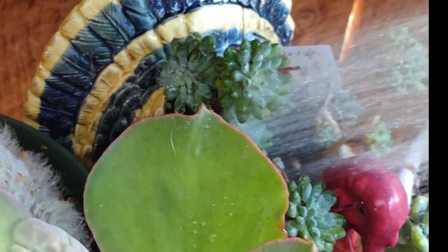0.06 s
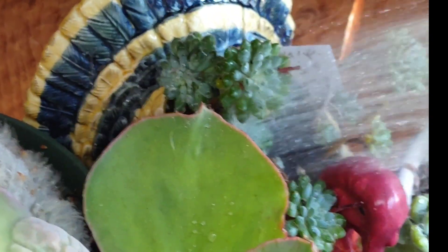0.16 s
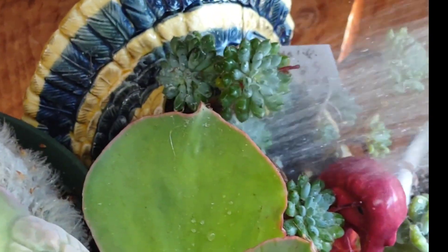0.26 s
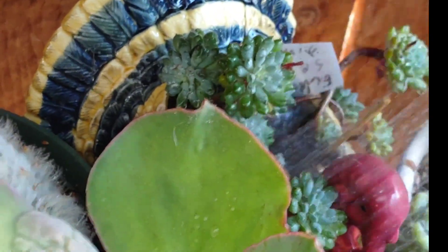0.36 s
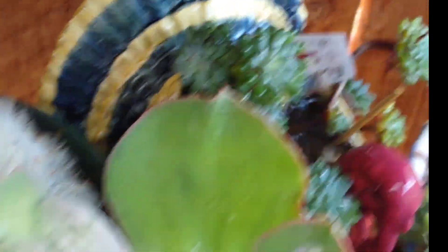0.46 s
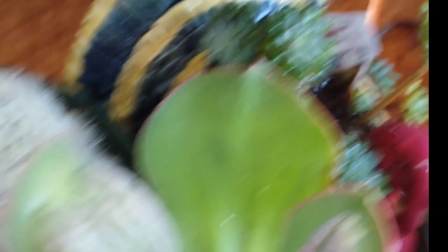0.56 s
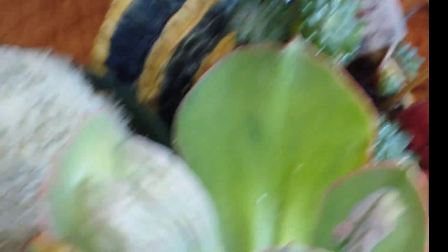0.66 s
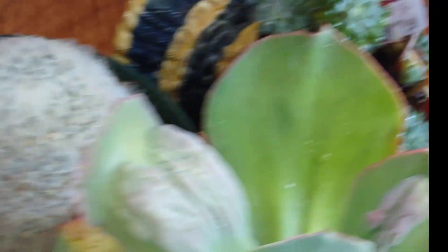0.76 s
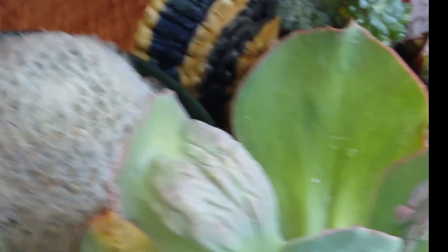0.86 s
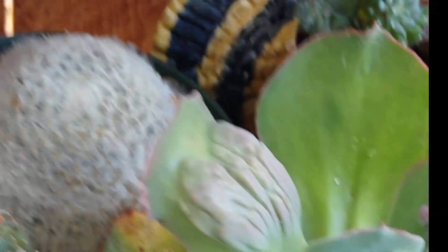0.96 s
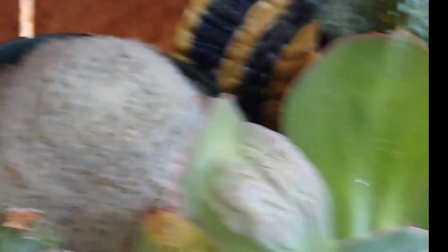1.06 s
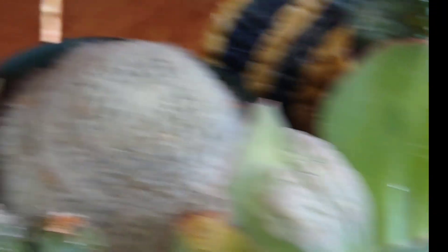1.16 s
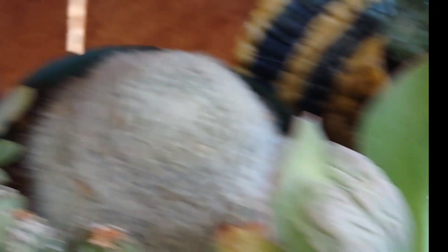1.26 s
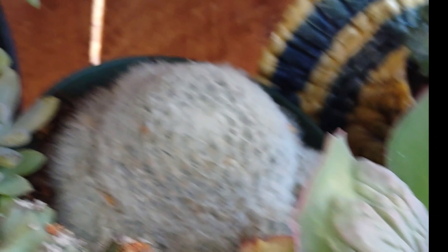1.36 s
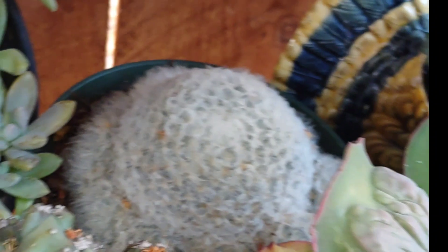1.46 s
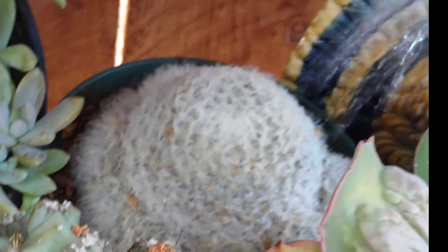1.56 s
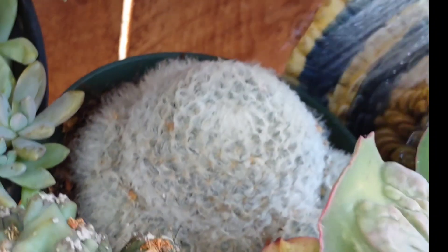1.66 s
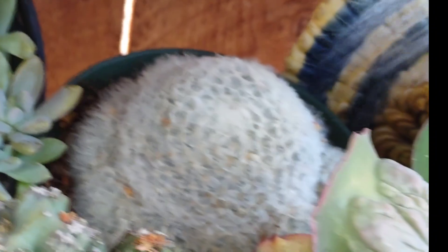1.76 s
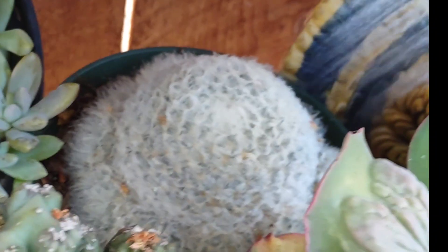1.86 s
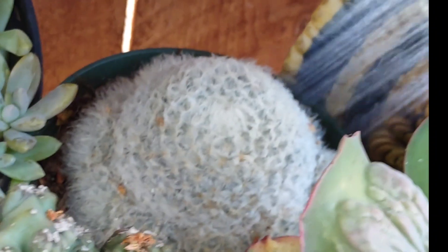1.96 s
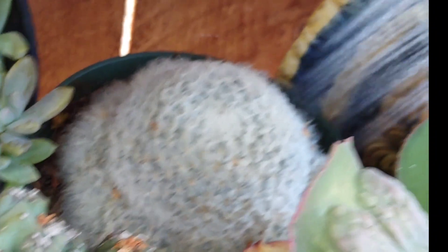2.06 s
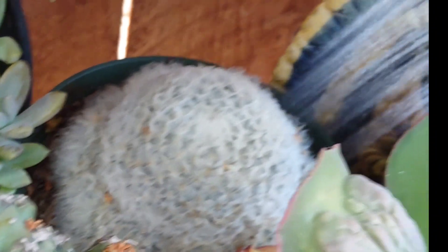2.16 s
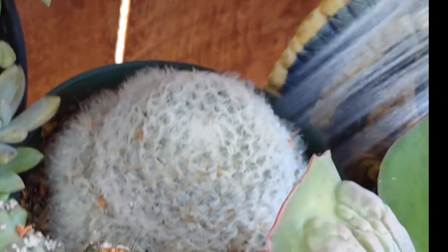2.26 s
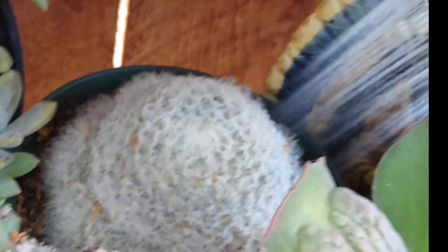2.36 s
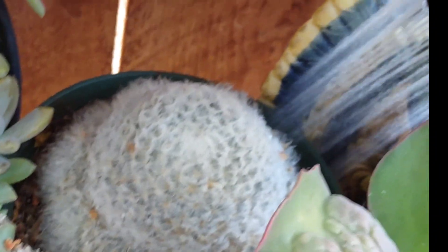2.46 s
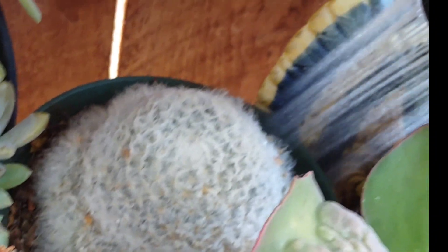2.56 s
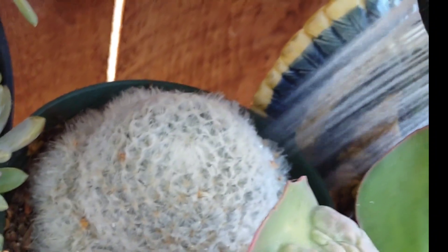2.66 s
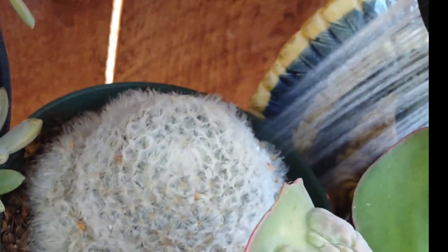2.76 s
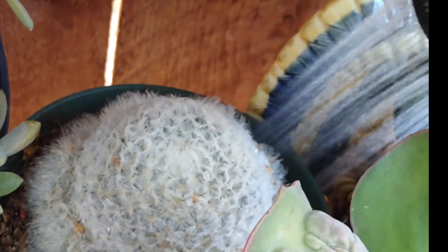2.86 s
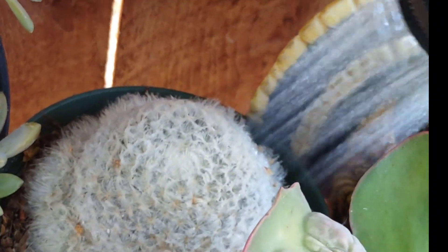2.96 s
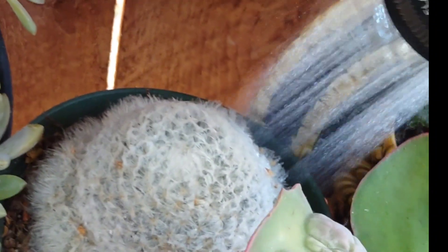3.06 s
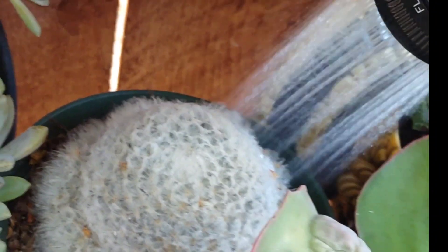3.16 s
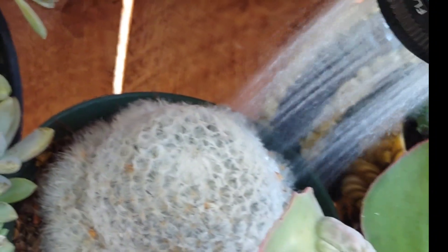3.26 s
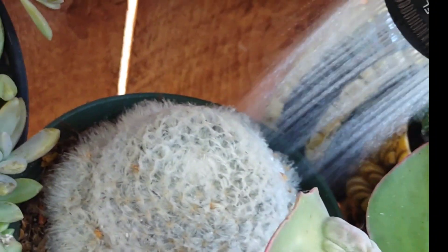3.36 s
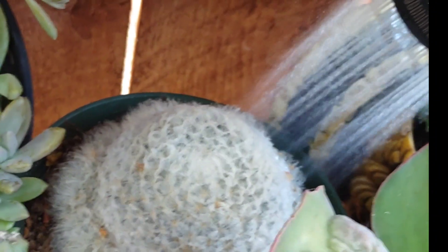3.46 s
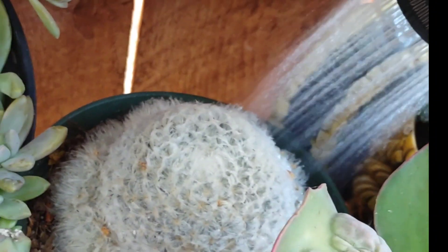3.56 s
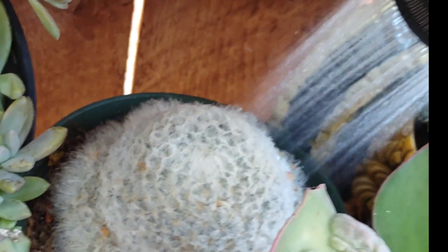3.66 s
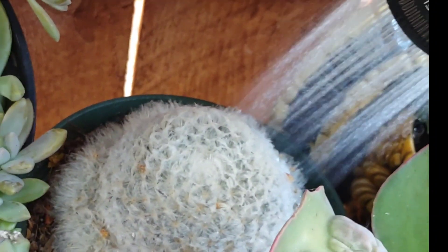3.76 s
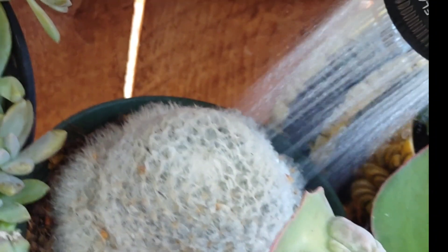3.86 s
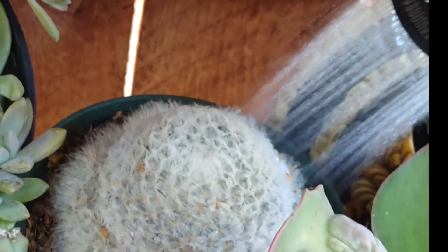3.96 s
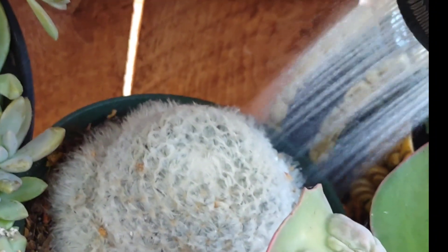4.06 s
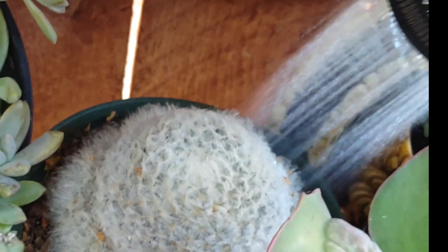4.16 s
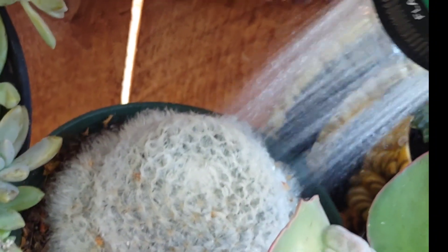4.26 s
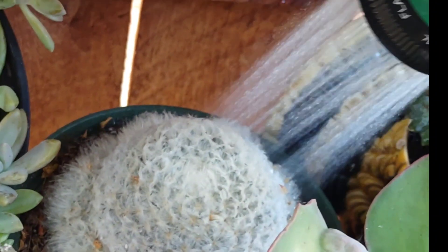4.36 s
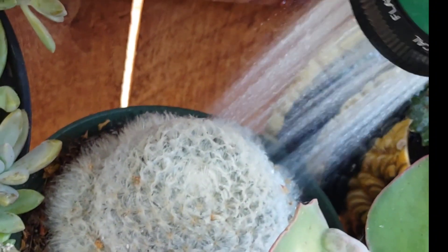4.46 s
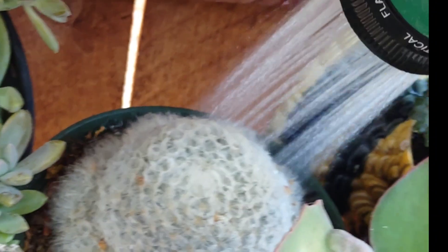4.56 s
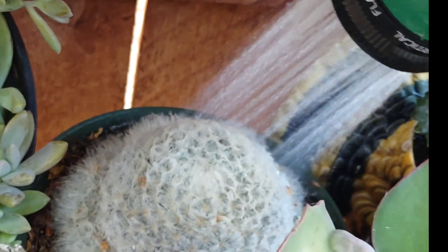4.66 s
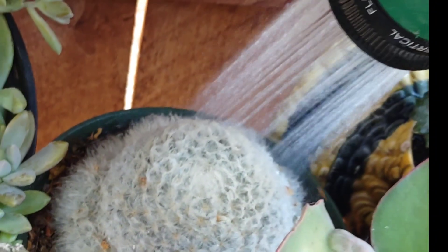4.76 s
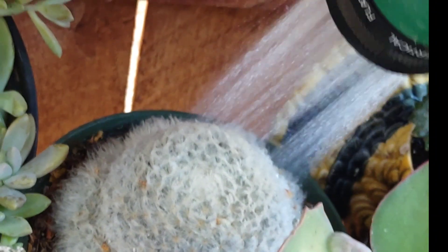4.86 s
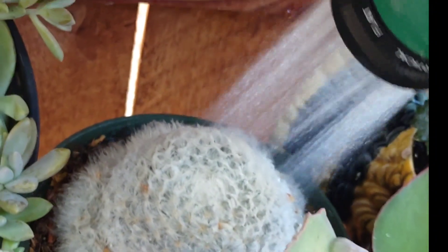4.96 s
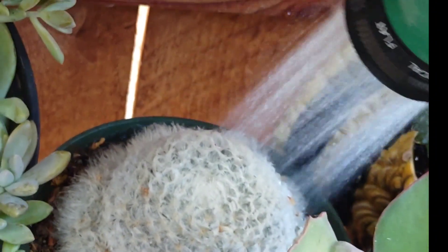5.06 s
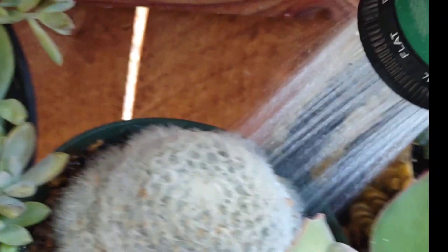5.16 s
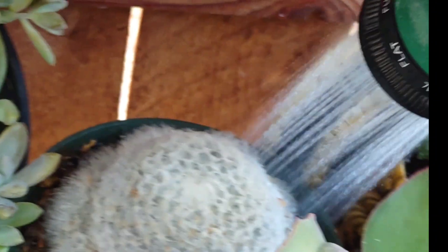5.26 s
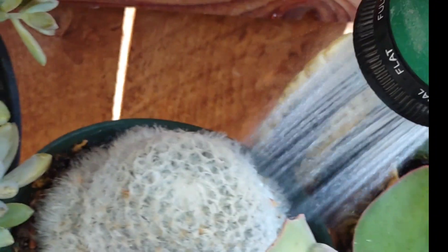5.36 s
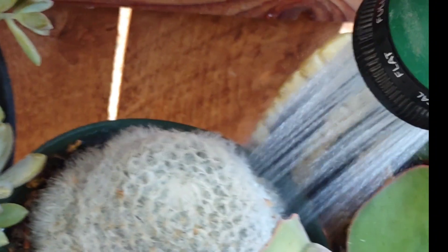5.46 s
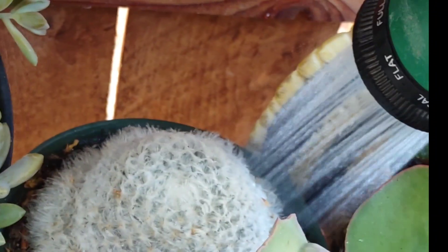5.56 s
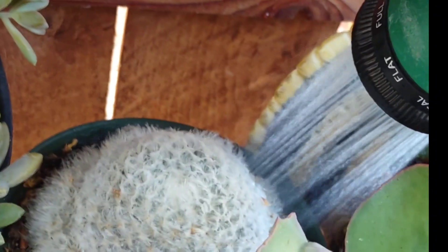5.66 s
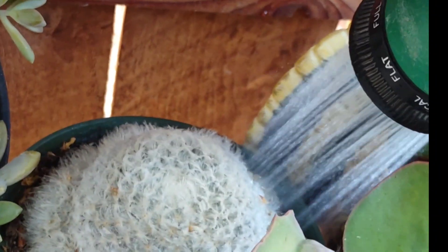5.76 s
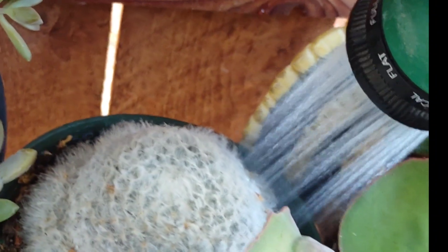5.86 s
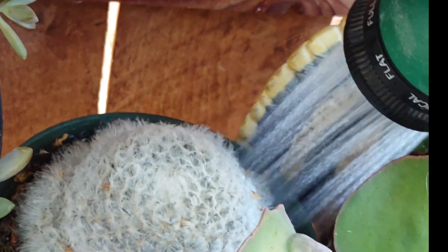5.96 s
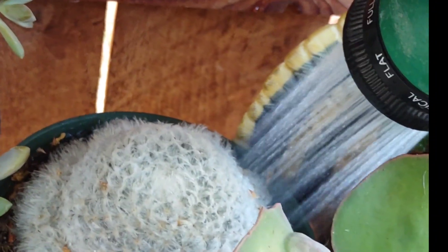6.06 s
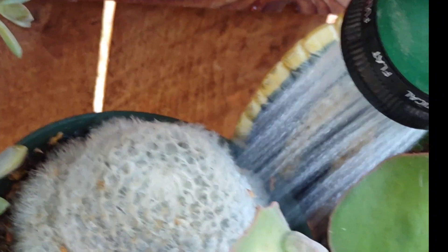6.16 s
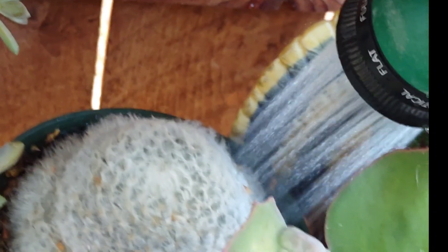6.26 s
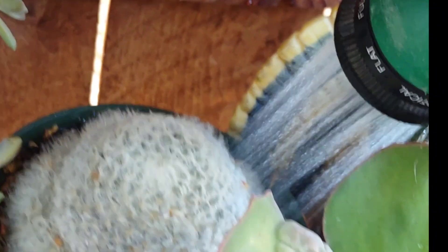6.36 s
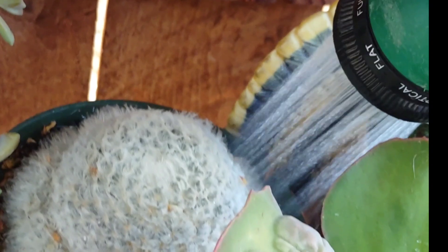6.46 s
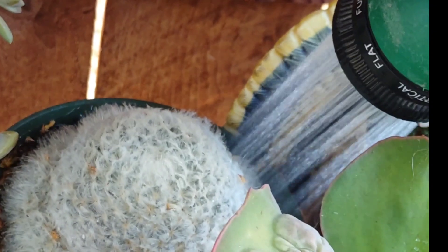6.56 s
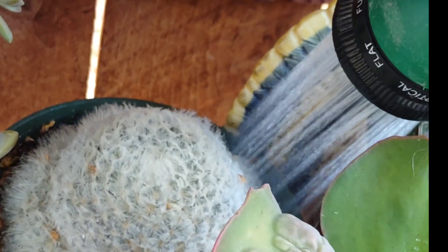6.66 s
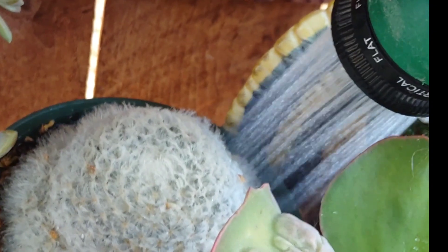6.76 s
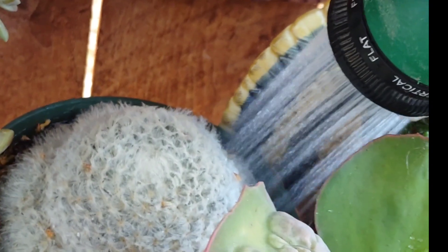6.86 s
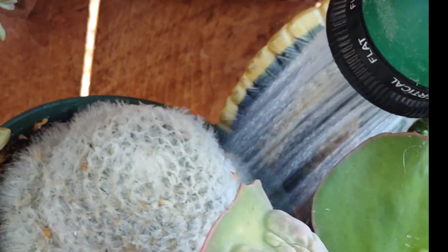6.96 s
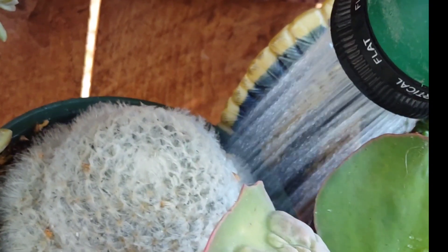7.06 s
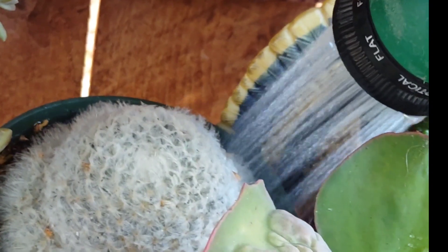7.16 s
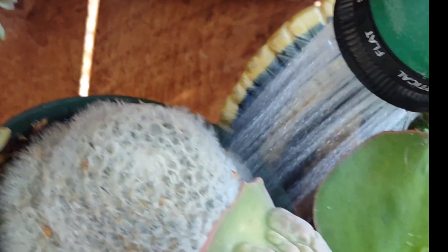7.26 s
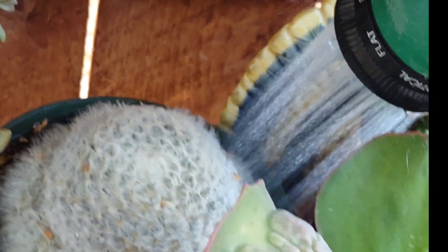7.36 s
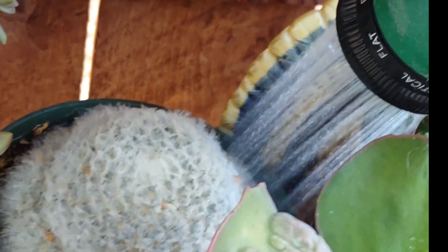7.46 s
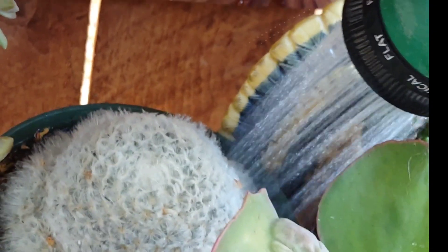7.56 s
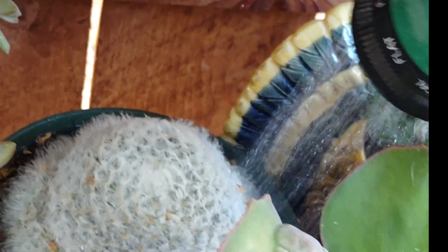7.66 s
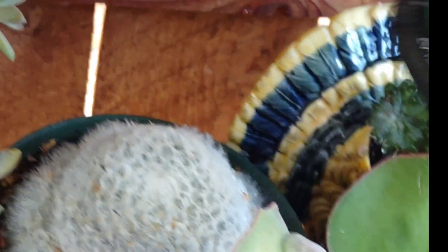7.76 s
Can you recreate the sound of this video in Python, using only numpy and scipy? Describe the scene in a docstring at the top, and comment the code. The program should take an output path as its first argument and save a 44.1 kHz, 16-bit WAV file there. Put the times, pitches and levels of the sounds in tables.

```python
"""A garden hose sprays potted succulents an arm's length away, outdoors, and is let go almost at once.
For a second the plants drip and a few bubbles plink. The trigger snaps and the spray builds again on a
glazed ceramic dish: thousands of drops a second hiss and drum on leaves and glaze, coloured by the
hollows they land in as the aim moves. Clumps of water slap the leaves and the hand bumps the nozzle.
Just before the end the jet shuts off, leaving a few last drips."""
import sys
import numpy as np
from scipy import signal
from scipy.fft import rfft, irfft
from scipy.io import wavfile
from scipy.ndimage import map_coordinates

SR = 44100
rng = np.random.default_rng(int(sys.argv[2]) if len(sys.argv) > 2 else 0)


def int16_out(signal):
    """Quantize to a 16-bit WAV file."""
    q = np.round(np.clip(np.atleast_2d(signal).T, -1, 1) * 32767)
    wavfile.write(sys.argv[1], SR, q.astype(np.int16))


N = 343980
TIME = np.arange(N) / SR
BINS = np.maximum(np.arange(2049) * SR / 4096, 1)  # frequency axis of every tone curve [Hz]
DRUM_POWER = 2.3  # drumming and slaps grow faster with the flow than the hiss does

# squeezes of the trigger: (valve opens [s], starts to close [s], closing time [s])
SQUEEZES = [(-1.6, 0.26, 0.075), (1.397, 7.648, 0.045)]
# bright tone of water trickling on the pots: (frequency [Hz], level [dB])
TRICKLE_TONE = [(400, -16.5), (1900, -15), (2400, -7.5), (2950, -0.5), (3700, 3), (4500, 3.5), (5600, 5.5),
                (6500, 4), (8600, 6), (10000, 1.5), (11500, 8.5), (15000, 0)]


def undb(db):
    """Decibels to gain."""
    return 10 ** (np.asarray(db) / 20)


def unit(x):
    """Scale to rms 1."""
    return x / np.sqrt(np.mean(x ** 2))


def shape(points):
    """A tone curve through (Hz, dB) points on a log-frequency axis."""
    hz, db = np.transpose(points)
    return np.interp(np.log(BINS), np.log(np.sort(hz)), db)


def lifts(modes):
    """A tone curve of peaks and dips, each (Hz, width in Hz, lift in dB)."""
    return sum(db / (1 + (2 * (BINS - hz) / width) ** 2) for hz, width, db in modes)


def colour(x, db):
    """Minimum-phase EQ: apply a tone curve with no ringing ahead of the attack."""
    cepstrum = irfft(np.log(undb(db)))
    half = len(cepstrum) // 2
    cepstrum[1:half] *= 2
    response = irfft(np.exp(rfft(cepstrum[:half], 2 * half)))[:half]
    return signal.oaconvolve(x, response[None], axes=-1)[:, :x.shape[-1]]


def pan(db):
    """Left and right gains for a pan given as left minus right in dB."""
    return undb(np.array([db, -db]).reshape(2, -1) / 2)


def walk(rate):
    """Random wandering with a spread near 1, heading for a new value `rate` times a second."""
    knots = rng.standard_normal(2000)
    return np.interp(TIME * rate, np.arange(len(knots)), knots)


def add(out, s, sound):
    """Mix a sound in at s seconds."""
    start = int(s * SR)
    out[:, start:start + sound.shape[1]] += sound[:, :N - start]


def spread(pair):
    """Stereo width: the right side is part the left one, shifted in phase, and part its own."""
    # how alike the two microphones hear: (frequency [Hz], coherence [0-1], right-to-left phase [rad])
    likeness = [(120, .96, 0), (350, .84, 0), (750, .55, -.1), (950, .3, -.5), (1150, .75, -.5),
                (1400, .65, -1.1), (1600, .2, -.5), (1780, .65, .4), (2000, .8, -.3), (2450, .65, -.5),
                (2800, .25, -.8), (3300, .45, -1.6), (3800, .55, -3.3), (4400, .55, -5.4),
                (5000, .45, -4.8), (6400, .55, -2.6), (7300, .45, -2.3), (9300, .2, -3.1),
                (10400, .25, -6.2), (12500, .15, -11)]
    hz, coherence, phase = np.transpose(likeness)
    bins = np.arange(N // 2 + 1) * SR / N
    alike = np.interp(bins, hz, coherence).clip(0, 1)
    left, own = rfft(pair)
    right = alike * np.exp(1j * np.interp(bins, hz, phase)) * left + np.sqrt(1 - alike ** 2) * own
    return np.array([pair[0], irfft(right, N)])


def garden(air_db=-64, hum_hz=209, hum_db=-75):
    """A bed of quiet outdoor air with a faint far-off hum."""
    # dark tone of the open air: (frequency [Hz], level [dB])
    air_tone = [(20, -13), (60, 2), (130, 5), (200, 1.5), (400, 2.5), (700, -5), (1500, -5), (4000, -30),
                (15000, -49)]
    air = unit(colour(spread(rng.standard_normal((2, N))), shape(air_tone)))
    hum = np.sin(2 * np.pi * hum_hz * TIME + walk(rate=6))
    return undb(air_db + 1.8 * walk(rate=3.82)) * air + undb(hum_db) * hum


def thud(hz, width_hz, decay_s):
    """A short push on something damped, with one broad resonance; peak 1."""
    t = TIME[:4096]
    push = np.exp(-t / decay_s) * rng.standard_normal((1, len(t)))
    detune = (BINS - hz ** 2 / BINS) / width_hz
    body = colour(push, -20 * np.log10(1 + detune ** 2).clip(0, 5))
    return body / abs(body).max()


def knocks():
    """The hand bumps and shifts on the nozzle."""
    # bumps: (time [s], peak [dB], pitch [Hz], width [Hz], decay [s], pan [dB])
    bumps = [(4.0105, -19, 3400, 5000, .0015, 14), (4.011, -38.5, 400, 1800, .0015, 6),
             (4.838, -46, 170, 700, .02, 0), (4.87, -46.5, 570, 220, .014, -1),
             (4.89, -51, 340, 340, .018, 0), (5.508, -48, 220, 420, .007, 0),
             (6.922, -50, 300, 700, .006, 0)]
    out = np.zeros((2, N))
    for s, db, hz, width_hz, decay_s, pan_db in bumps:
        add(out, s, undb(db) * pan(pan_db) * thud(hz, width_hz, decay_s))
    return out


def trigger(echo_db=-31, echo_decay_s=0.0057):
    """The nozzle's plastic trigger snaps; the pots send back a thin, bright echo."""
    # snaps: (time [s], gain [dB], pan [dB])
    snaps = [(1.295, -2.5, 16.5), (1.438, -13, 11)]
    # tone of the snapping plastic: (frequency [Hz], level [dB])
    snap_tone = [(150, -27), (500, -10), (1400, -6), (3000, -3), (6000, -23), (8500, 20.5), (10200, -6),
                 (12000, -2), (13000, -8), (15000, -14)]
    out, t = np.zeros((2, N)), TIME[:2048]
    crack = colour(signal.unit_impulse(len(t))[None], shape(snap_tone))
    for s, db, pan_db in snaps:
        echo = undb(echo_db) * np.exp(-t / echo_decay_s) * rng.standard_normal((2, len(t)))
        add(out, s, undb(db) * pan(pan_db) * (crack + colour(echo, shape(TRICKLE_TONE))))
    return out


def bubble(hz, attack_s=0.00077, decay_s=0.005):
    """A trapped bubble rings for a few milliseconds, roughened by the splash around it."""
    t = TIME[:2048]
    envelope = (1 - np.exp(-t / attack_s)) * np.exp(-t / decay_s)
    wobble = .16 * np.cumsum(rng.standard_normal((2, len(t))), axis=1)
    return envelope * np.sin(2 * np.pi * hz * t + wobble)


def bubbles(trim_db=-1, pan_db=1.5):
    """A few drips fall into standing water and plink."""
    # the clearest bubbles: (time [s], gain [dB], pitch [Hz])
    plinks = [(0.461, -34.5, 3000), (0.627, -37, 2900), (.702, -35, 2860), (0.816, -30.5, 3800),
              (.974, -29.5, 3030), (1.099, -40, 3100), (1.419, -36, 1900), (7.793, -27, 4900)]
    out = np.zeros((2, N))
    for s, db, hz in plinks:
        add(out, s, undb(db + trim_db) * pan(pan_db) * bubble(hz))
    return out


def splash(ring_hz, ring_db, softness_db, decay_s, ring_width_hz=600):
    """One drop spreads, fizzes out and rings the wet hollow that it hits."""
    # the wet pots ring under every drop: (frequency [Hz], width [Hz], lift [dB])
    wet_pots = [(2900, 180, 2.5), (3600, 430, -3), (4200, 200, 4), (4800, 300, -1), (5430, 320, 2),
                (6100, 300, -2), (8500, 310, 2)]
    t = TIME[:4096]
    attack = 1 - np.exp(-t / .00025)
    tail = undb(-16) * np.exp(-t / .018)
    envelope = attack * (np.exp(-t / decay_s) + tail)
    landing = (3600, 3000, softness_db)  # a soft landing sounds low, a hard one bright
    tone = shape(TRICKLE_TONE) + lifts([landing, (ring_hz, ring_width_hz, ring_db)] + wet_pots)
    tone -= 10 * np.log10(np.mean(undb(tone) ** 2))  # same power whatever the tone
    return colour(envelope * rng.standard_normal((2, len(t))), tone)


def drips(trim_db=-1, ring_db=7):
    """Fat drops fall from the leaves and the rim of the dish; a few big drops in the jet land among the spray."""
    # drips: (time [s], gain [dB], softness of landing [dB], pan [dB], ring [Hz], decay [s])
    fat_drops = [(.334, -26.5, 14, -2, 3900, 0.0039), (.374, -29.5, 7, -2, 5150, 0.011),
                 (.484, -30, -2, 2, 8570, .006), (0.537, -24.5, -24, -5, 8950, 0.0037),
                 (.571, -26.5, -2, 3, 4200, 0.0037), (.594, -22, -4, 0, 8600, 0.0033),
                 (.604, -29, 14, -3, 4460, 0.0034), (0.625, -17, 22, -4, 2900, 0.0035),
                 (0.667, -24.5, 7, -3, 5040, 0.002), (0.677, -27, 3, 1, 4000, 0.0021),
                 (0.744, -29, -49, 2, 8550, .004), (.767, -19, -13, -5, 5660, 0.0058),
                 (0.783, -27.5, -4, 0, 8630, 0.0075), (0.806, -30, -6, 2, 4240, 0.0084),
                 (.834, -30, -2, -1, 8440, 0.012), (.887, -30, -23, 0, 10800, .003),
                 (0.908, -25, -55, -4, 10500, .003), (.962, -27, -9, 0, 8200, .003),
                 (1.011, -27, -10, -2, 8360, .004), (1.076, -22, -50, 0, 7640, 0.0046),
                 (1.086, -26, -13, -7, 8400, .004), (1.168, -27.5, -55, -2, 8290, .004),
                 (1.2106, -26.5, 15, -6, 5500, .005), (1.236, -27, 9, -6, 5090, 0.0045),
                 (1.271, -28.5, 18, -3, 3040, 0.0037), (1.321, -27, -55, 0, 8840, .004),
                 (1.354, -31, 3, 1, 8370, 0.0044), (1.371, -25.5, 4, -6, 5700, 0.003),
                 (1.408, -25.5, 9, -1, 3310, 0.0055), (1.435, -20, 14, -11, 6340, 0.0026),
                 (1.485, -30, 3, -3, 8230, 0.0032), (1.701, -16.5, 19, -10, 3400, 0.0023),
                 (7.015, -20, 4, -11, 5000, 0.0035), (7.692, -28, 5, -4, 5100, .003),
                 (7.706, -25.5, -25, 2, 11400, .003), (7.732, -30.5, 20, -6, 5000, 0.0058),
                 (7.769, -26, -23, 5, 10500, 0.003), (7.773, -31, 6, -5, 4500, 0.0037)]
    out = np.zeros((2, N))
    for s, db, softness_db, pan_db, ring_hz, decay_s in fat_drops:
        add(out, s, undb(db + trim_db) * pan(pan_db) * splash(ring_hz, ring_db, softness_db, decay_s))
    return out


def impacts(per_second, scatter_db=0):
    """Clicks of drops landing at random; scatter makes a few stand out."""
    lands = rng.random(N) < per_second / SR
    size = undb(scatter_db * np.minimum(rng.exponential(size=N), 5))
    return unit(lands * size * rng.standard_normal((2, N)))


def draining(flow, start_db=-36.5, fall_db_per_s=3.5):
    """Strength of the run-off: it takes over as the jet stops, then ebbs."""
    strength = np.zeros(N)
    for _, closes, _ in SQUEEZES:
        ebb = undb(start_db - fall_db_per_s * (TIME - closes))
        strength = np.where(TIME > closes, ebb, strength)
    return strength * (1 - flow)


def run_off(flow, fizz_db=-4, drops_per_s=110, scatter_db=6.5, bubble_share=.025):
    """Small drops fall from the wet plants, a few trapping a bubble, over the fizz of soaking soil."""
    strength = draining(flow)
    fizz_tone = shape(TRICKLE_TONE) + lifts([(3640, 9800, -7), (14500, 1900, 6)])  # soft mids, airy top
    fizz = unit(colour(impacts(per_second=4800, scatter_db=1.5), fizz_tone))
    out = strength * undb(fizz_db + 3.2 * walk(rate=60)) * fizz
    jitter_s = 2 / drops_per_s
    times = np.arange(0, TIME[-1] - jitter_s, 1 / drops_per_s)
    times += jitter_s * rng.random(len(times))
    traits = rng.uniform(-.8, 1, (len(times), 4))
    for s, (size, pitch, soft, side), luck in zip(times, traits, rng.random(len(times))):
        if flow[int(s * SR)] < .5:
            drop = splash(5800 * 2 ** (.7 * pitch), ring_db=12, softness_db=10 * soft - 8, decay_s=.0025)
            gain = strength[int(s * SR)] * undb(scatter_db * size) * pan(4 * side)
            add(out, s, gain * drop)
            if luck < bubble_share:
                add(out, s, gain * bubble(3800 * 2 ** (.5 * pitch)))
    return out


def splats(flow, per_second=14, small_db=-36, centre_hz=2700, scatter_db=3, pan_db=-3):
    """Clumps in the jet slap on the leaves: a few big ones, and many small ones each at its own pitch."""
    # big slaps on broad leaves: (time [s], peak [dB], pitch [Hz], width [Hz], decay [s], pan [dB])
    big_slaps = [(2.239, -49, 724, 400, .018, 0), (3.929, -33, 920, 700, .010, -5),
                 (4.456, -26, 2000, 1800, .006, -2), (4.456, -36, 1000, 700, .012, -3)]
    out = np.zeros((2, N))
    for s, db, hz, width_hz, decay_s, side_db in big_slaps:
        add(out, s, undb(db) * pan(side_db) * thud(hz, width_hz, decay_s))
    for when, pitch, size in rng.random((int(per_second * TIME[-1]), 3)):
        hz = centre_hz * 2 ** (pitch - .5)
        force = flow[int(when * N)] ** DRUM_POWER
        gain = force * undb(small_db + scatter_db * (2 * size - 1)) * hz / centre_hz
        add(out, when * TIME[-1], gain * pan(pan_db) * thud(hz, width_hz=hz / 5, decay_s=.007))
    return out


def valve(rise_s=0.19):
    """Flow from 0 to 1: it builds up after each squeeze and dies quickly on release."""
    flow = 0
    for opens, closes, closing_s in SQUEEZES:
        rise = 1 - np.exp(-np.maximum(TIME - opens, 0) / rise_s)
        release = np.exp(-(np.maximum(TIME - closes, 0) / closing_s) ** 2)
        flow += rise * release
    return flow


def reflections(pair, strength=.15, drift=.025, count=4):
    """Echoes off nearby pots comb the sound; the comb shifts as the jet wanders."""
    out, index = pair, np.arange(N)
    for _ in range(count):
        lag_s = rng.uniform(0.001505, .009) * (1 + drift * walk(rate=2.5))
        echo = np.array([np.interp(index - lag_s * SR * rng.uniform(.9, 1.1), index, x) for x in pair])
        out = out + strength * echo
    return unit(out)


def side_colour(pair):
    """Fine peaks and dips of the spray at each microphone, with the right port's deep treble notch."""
    # peaks and dips on each side: (frequency [Hz], width [Hz], lift [dB])
    left_eq = [(1326, 84, -6), (1830, 130, 1.5), (2230, 410, 4.5), (3075, 170, -3), (3280, 360, 2.5),
               (3736, 90, 4.5), (4000, 240, -3), (4110, 110, 4), (4300, 87, -5.5), (4480, 100, 2.5),
               (4730, 98, -0.5), (4820, 180, 4.5), (5270, 200, -1), (5970, 160, 3.5), (6320, 140, 1.5),
               (7530, 180, 2.5), (7800, 170, 5)]
    right_eq = [(1270, 180, -3), (1710, 250, -3), (2420, 1030, 6.5), (2950, 210, -1), (3500, 270, -5),
                (3920, 310, 5), (4760, 230, -3), (5015, 110, 3.5), (5950, 260, -2.5), (7130, 250, 2),
                (7600, 500, -4), (10100, 500, -28), (11000, 630, 3), (12420, 220, -18)]
    return np.vstack([colour(pair[:1], lifts(left_eq)), colour(pair[1:], lifts(right_eq))])


def sway(pair, depth=.004):
    """The water film moving through the hollows bends all resonances up and down a little."""
    index = np.arange(N) + np.cumsum(depth * walk(rate=6))
    return np.array([map_coordinates(x, [index], mode="mirror") for x in pair])


def aimed_tone(drops):
    """Hiss and drumming of the drops, crossfaded from one tone to the next as the aim moves."""
    # peaks and dips in the spray's tone while aimed at each place: (frequency [Hz], width [Hz], lift [dB])
    among_pots = [(420, 350, -8), (1593, 270, 18), (2260, 170, -5.5), (2760, 190, 6.5), (3250, 110, -6),
                  (3570, 130, -2), (3890, 170, 9), (5000, 220, -8), (5430, 150, 5), (5940, 500, -2),
                  (10130, 490, 4.5), (11560, 210, 0)]
    dish_foot = [(1480, 200, 10), (2400, 200, 1.5), (3450, 110, 6), (3000, 400, -3), (4560, 290, -12),
                 (5600, 280, 7), (6000, 200, -3), (7500, 270, 2), (10160, 130, -4)]
    dish_rim = [(1155, 91, 4.5), (1736, 120, -9.5), (2320, 280, 3.5), (3400, 140, 6), (4180, 140, -3),
                (4420, 110, 2.5), (5800, 390, 3.5), (7060, 100, -0.5), (10490, 170, 2.5)]
    dish_bowl = [(1156, 115, 11.5), (1560, 110, -3), (1870, 400, 6.5), (2370, 710, -5.5), (2620, 140, -2.5),
                 (3490, 190, -4), (4160, 93, 2.5), (5380, 115, 8), (6150, 3200, -3), (7020, 120, 4.5),
                 (7400, 190, -0.5), (9280, 1200, 4), (9810, 1060, -7), (10250, 190, 2.5)]
    dish_close = [(945, 120, -2.5), (1165, 90, 3.5), (1560, 90, -7.5), (1820, 600, -3), (2630, 120, -5),
                  (4470, 180, 5.5), (4970, 190, 5), (5200, 150, 1.5), (6450, 350, -3.5), (7150, 220, 1.5),
                  (10120, 300, 2.5), (10970, 320, -4), (12050, 300, 8)]
    places = [among_pots, dish_foot, dish_rim, dish_bowl, dish_close]
    # drumming against the hiss at each place: (level [dB])
    drum_levels = [-22.5, -23.5, -23, -22.5, -22]
    # where the jet lands: (time [s], place [index in places])
    aim_path = [(0, 0), (.6, 0), (1.3, 1), (1.66, 1), (1.95, 2), (2.55, 2), (3.05, 3), (4.9, 3), (5.4, 4),
                (7.56, 4), (7.64, 2), (7.72, 1)]
    # bright hiss and mid-range drumming: (frequency [Hz], level [dB])
    hiss_tone = [(1400, -33.5), (1900, -31.5), (2150, -8.5), (3050, -3), (3350, 2.5), (4600, -0.5),
                 (5500, 1.5), (7000, 1.5), (10000, 2), (15500, 1)]
    drum_tone = [(100, -29), (300, -19.5), (600, -21), (900, -12), (1100, -2.5), (1350, 6), (1600, -2),
                 (1800, 8), (2050, 3.5), (2600, -9), (4000, -30)]
    aim = np.interp(TIME, *np.transpose(aim_path))
    hiss, drum = 0, 0
    for place, (modes, drum_db) in enumerate(zip(places, drum_levels)):
        share = np.maximum(1 - abs(aim - place), 0)
        hiss += share * unit(colour(drops, shape(hiss_tone) + lifts(modes)))
        drum += share * undb(drum_db) * unit(colour(drops, shape(drum_tone) + lifts(modes)))
    return hiss, drum


def jet_drops(flow, spatter_db=-17):
    """A dense rain of fine drops with a sparser spatter in it; a weak jet lands more lightly."""
    # tone of the spatter, and the slight dulling of a weak jet: (frequency [Hz], level [dB])
    spatter_tone = [(1000, -7.5), (2200, -4), (5000, -1.5), (9000, -8.5)]
    weak_tone = [(1900, -0.5), (4500, -3)]
    spatter = unit(colour(impacts(per_second=1400), shape(spatter_tone)))
    drops = reflections(spread(impacts(per_second=26000) + undb(spatter_db) * spatter))
    return flow * drops + (1 - flow) * colour(drops, shape(weak_tone))


def spray(flow):
    """The jet hisses and drums; breaking into clumps, it surges and flutters, and sputters when weak."""
    # the full jet as the hand moves it nearer and farther: (time [s], level [dB], pan [dB])
    jet_moves = [(.05, -20.5, -1.8), (.3, -22, -0.3), (1.55, -17, -2), (1.95, -18, -1), (2.15, -18, -1),
                 (2.3, -16.5, -1), (2.8, -17.5, -2), (3.1, -19, -0.2), (3.6, -18.5, -0.5), (3.9, -18, -0.5),
                 (4.3, -19, -0.5), (4.5, -18.5, 1), (4.95, -19, .5), (5.06, -19, 1.3), (5.25, -19.5, -0.5),
                 (6.1, -20, 0.8), (6.9, -21, 0.3), (7.6, -22, 0.7)]
    times, levels, pans = np.transpose(jet_moves)
    jet_db, pan_db = np.interp(TIME, times, levels), np.interp(TIME, times, pans)
    hiss, drum = aimed_tone(jet_drops(flow))
    surge_db = 0.56 * walk(rate=12)
    flutter_db = 0.31 * walk(rate=35) + 0.59 * walk(rate=220)
    sputter_db = 3 * (1 - flow) ** 2 * walk(rate=110)
    hiss = flow * pan(pan_db) * sway(hiss)
    drum = flow ** DRUM_POWER * pan(db=1) * undb(1.23 * walk(rate=25)) * drum
    return side_colour(undb(jet_db + surge_db + flutter_db + sputter_db) * (hiss + drum))


def scene():
    """Spray, dripping plants and the nozzle in a quiet garden."""
    flow = valve()
    jet = spray(flow) + splats(flow)
    dripping = spread(run_off(flow) + drips()) + bubbles()
    return jet + dripping + trigger() + knocks() + garden()


def record(dry, top_hz=15500):
    """Each microphone port has its own treble resonance; the top is cut steeply."""
    # tone of each sound port: (frequency [Hz], gain [dB])
    left_port = [(300, -1), (1200, 1), (3400, 3.5), (5000, 0), (6500, 4.5), (7400, -0.5), (8750, -12.5),
                 (9600, 1), (10300, 13.5), (10800, 8.5), (11400, 7.5), (12100, -3), (12800, -8),
                 (15200, -13)]
    right_port = [(300, -2), (700, 0.5), (1200, -5), (2100, -1.5), (3400, -4.5), (4700, -2), (5100, 3.5),
                  (6100, 2), (7900, 1.5), (8750, 5), (9500, -3), (10150, -20), (11300, -9.5),
                  (12200, -16.5), (12700, -38.5)]
    heard = np.vstack([colour(dry[:1], shape(left_port)), colour(dry[1:], shape(right_port))])
    return signal.sosfilt(signal.ellip(10, .2, 80, top_hz, fs=SR, output="sos"), heard)


dry = scene()
out = record(dry)
int16_out(out)
```